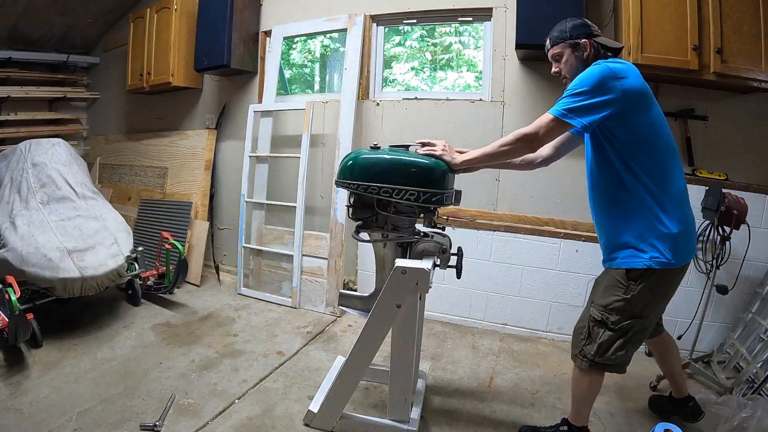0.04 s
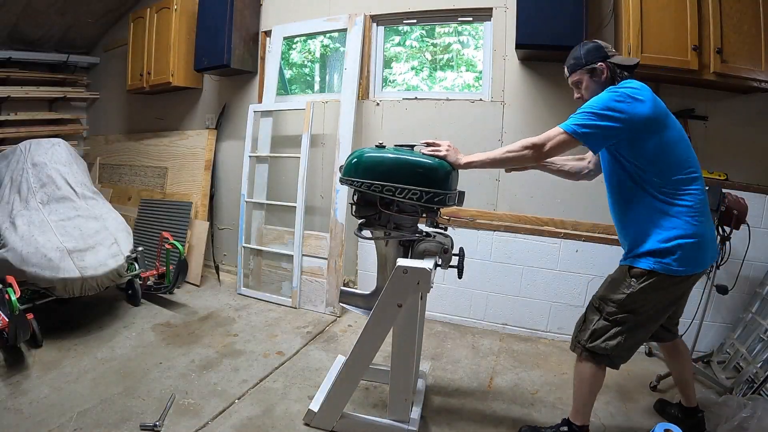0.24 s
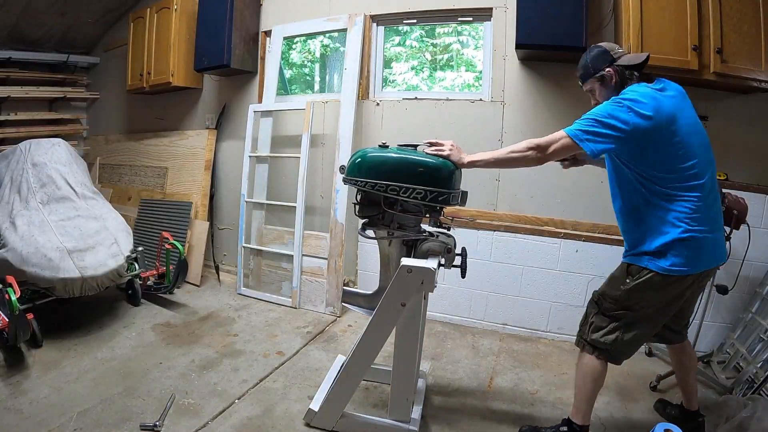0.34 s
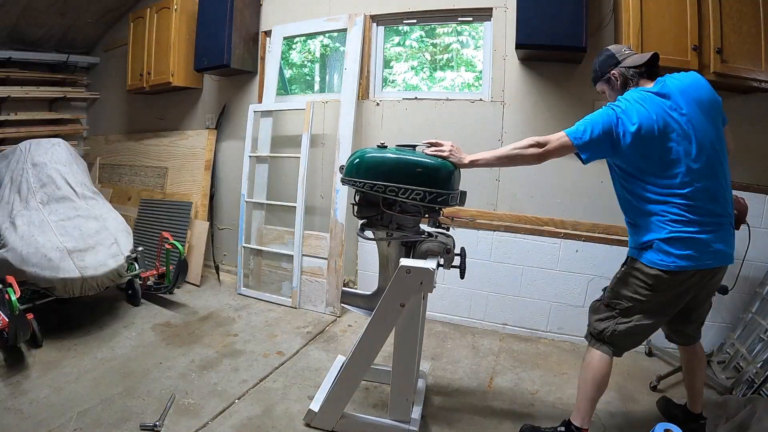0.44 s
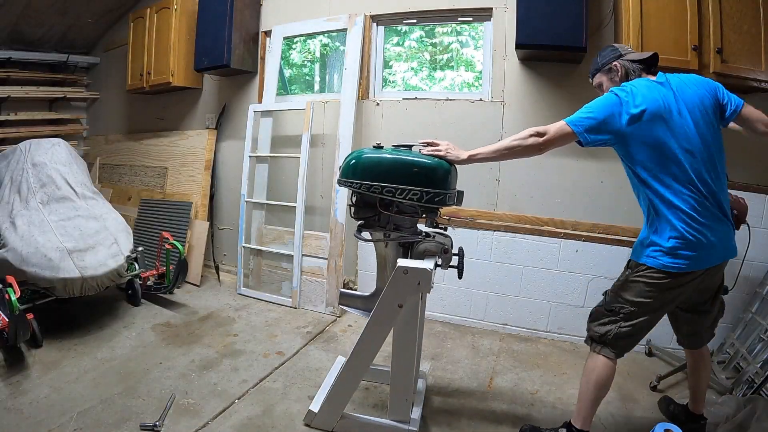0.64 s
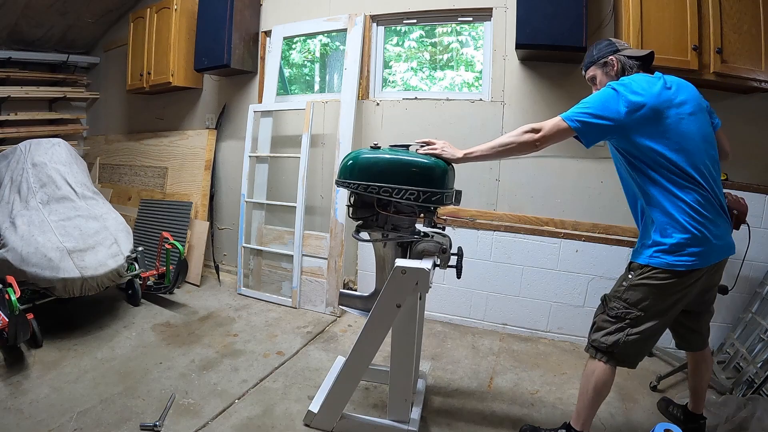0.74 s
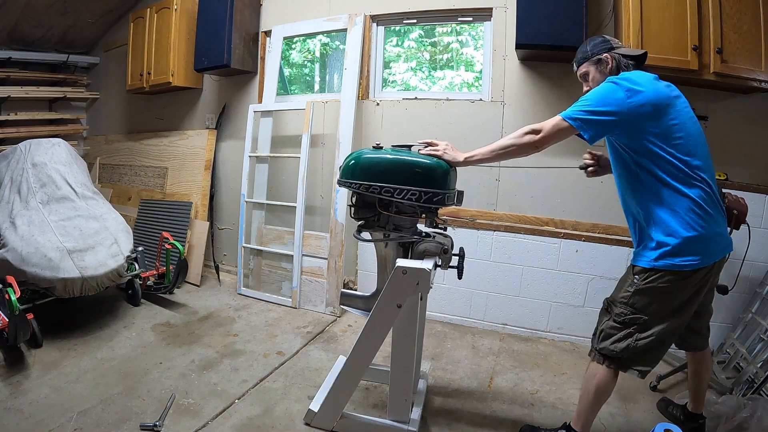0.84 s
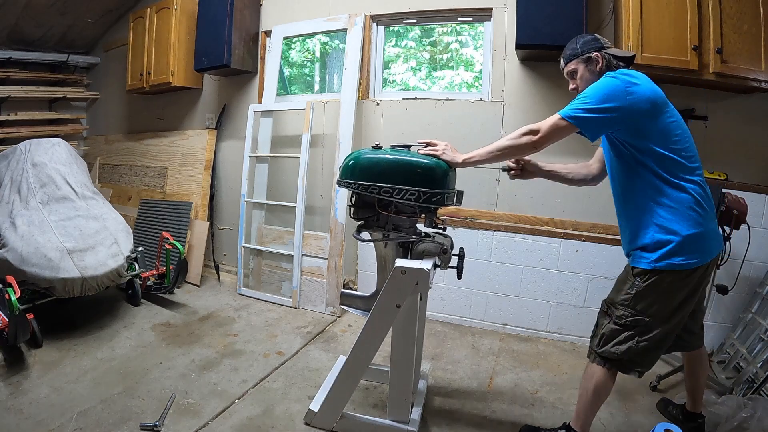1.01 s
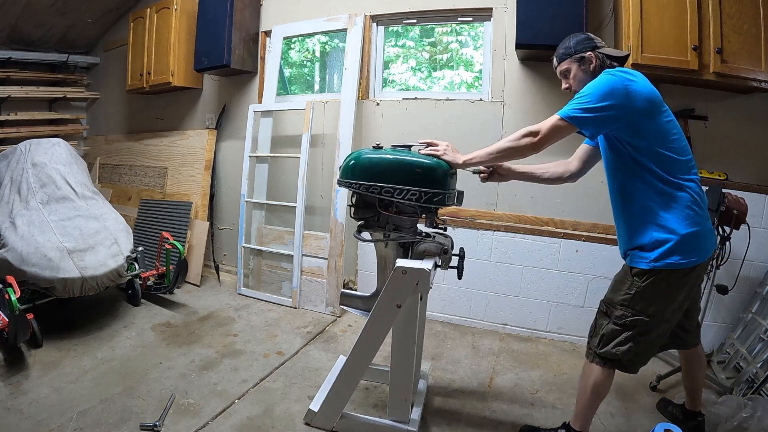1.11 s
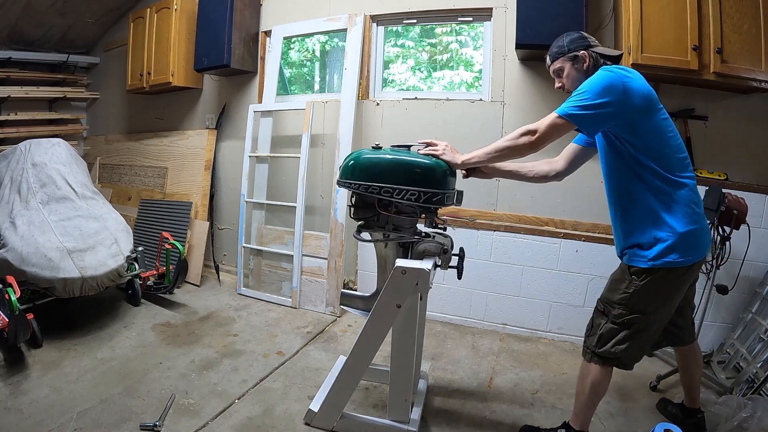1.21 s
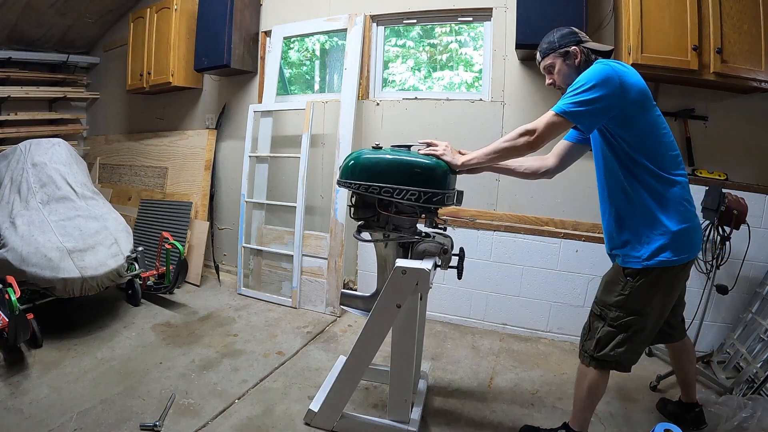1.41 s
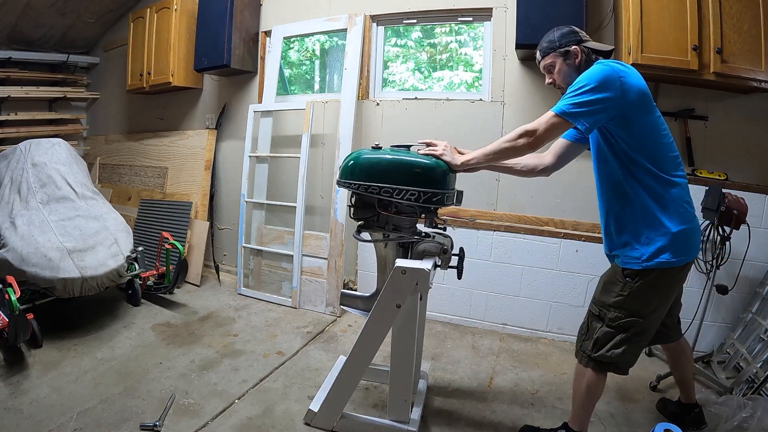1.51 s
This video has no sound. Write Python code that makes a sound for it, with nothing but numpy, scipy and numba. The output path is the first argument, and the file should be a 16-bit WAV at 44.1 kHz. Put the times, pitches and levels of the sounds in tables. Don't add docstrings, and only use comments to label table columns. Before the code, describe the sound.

An outboard engine turns over but does not fire. After a brief quiet low throb, a sharp clank, rapid clattering chugs, slowing rattles and a final bright metallic snap, in a reverberant garage heard from a few metres.

```python
import sys
import numpy as np
from scipy import signal
from scipy.fft import rfft, irfft
from scipy.io import wavfile
from scipy.ndimage import uniform_filter1d
from numba import njit

SR = 44100
rng = np.random.default_rng(int(sys.argv[2]) if len(sys.argv) > 2 else 0)


def bounce(signal):
    frames = np.transpose(np.atleast_2d(signal))
    limited = np.clip(frames, -1, 1)
    pcm = np.round(limited * 32767).astype(np.int16)
    wavfile.write(sys.argv[1], SR, pcm)


def ratio_of_db(decibels):
    return 10 ** (np.asarray(decibels, float) / 20)


N = 68355


def level(x, db):
    return x * ratio_of_db(db) / np.sqrt(np.mean(x ** 2))


def cut(x, hz, kind, order=2):
    return signal.sosfilt(signal.butter(order, hz, kind, fs=SR, output="sos"), x)


def colour(x, points):
    hz, db = np.array(points).T
    size = 2048
    bins_hz = np.arange(size // 2 + 1) * SR / size
    log_gain = np.interp(np.log(bins_hz + 1), np.log(hz), db) * np.log(10) / 20
    cepstrum = irfft(log_gain)
    cepstrum[1:size // 2] *= 2
    cepstrum[size // 2 + 1:] = 0
    h = irfft(np.exp(rfft(cepstrum)))
    return signal.fftconvolve(x, h / np.sqrt(np.sum(h ** 2)))[:N]


@njit
def ring(x, hz, t60):
    y, z = np.empty(len(x)), 0j
    pole = np.exp(2j * np.pi * hz / SR - np.log(1000.) / (t60 * SR))
    for i in range(len(x)):
        z = z * pole + x[i]
        y[i] = z.imag
    return y


def wander(step_s, smooth):
    size = int(step_s * SR)
    return uniform_filter1d(np.repeat(rng.standard_normal(N // size + 1), size), smooth)[:N]


def body(x, modes):
    wander_db, wander_s = 3, 0.025
    out = np.zeros(N)
    for hz, db, t60 in modes:
        share = rng.standard_normal(N) * ratio_of_db(wander_db * wander(wander_s, int(wander_s * SR)))
        out += ratio_of_db(db) / np.sqrt(t60) * ring(x * share, 1. * hz, 1. * t60)
    power = sum(ratio_of_db(2 * db) for _, db, _ in modes)
    return out / np.sqrt(power * SR / 4 / np.log(1000))


def clicks(rate_per_s):
    scatter_db = 2.5
    hits = (rng.random(N) < rate_per_s / SR) * rng.standard_normal(N)
    return level(hits * ratio_of_db(scatter_db * np.minimum(rng.exponential(size=N), 3)), 0)


def burst(t, s, db, fall_s, rise_s=0.005):
    u = np.maximum(t - s, 0)
    return ratio_of_db(db) * (1 - np.exp(-u / rise_s)) * np.exp(-u / fall_s)


def push(t, s, db, length_s):
    u = (t - s) / length_s
    return ratio_of_db(db) * np.sin(np.pi * np.clip(u, 0, 1)) * np.pi / (2 * length_s * SR)


# freq_hz [Hz], density_db [dB per Hz]
AIR_SPECTRUM = [(150, -1.5), (400, -11), (800, -21), (1200, -7), (2300, -16), (4400, -14.5), (8000, -16.5),
                (13000, -23)]


def background(t):
    throb_hz, steady, beat_s, beat_null_s = 75.5, 0.063, 0.105, 0.112
    beat = steady * np.clip(t, 0, 1) + np.sin(np.pi * (t - beat_null_s) / beat_s)
    throb = level(np.cos(2 * np.pi * throb_hz * t) * beat, -34.5)
    rumble = level(cut(rng.standard_normal(N + SR), [50, 90], "band", order=4)[SR:], -38)
    mid, side = (level(colour(rng.standard_normal(N), AIR_SPECTRUM), -56.5) for _ in range(2))
    duck_db, duck_at_s, duck_s = -7, 0.22, 0.084
    duck = ratio_of_db(duck_db * np.clip((t - duck_at_s) / duck_s, 0, 1))
    return duck * (throb + rumble) + mid + 0.5 * side * np.array([[1], [-1]])


@njit
def walls(x, lags, gain, damp):
    line, soft, out = np.zeros((8, 4096)), np.zeros(8), np.zeros((2, len(x)))
    for i in range(len(x)):
        total = 0.
        for k in range(8):
            soft[k] += (1 - damp) * (gain[k] * line[k, (i - lags[k]) & 4095] - soft[k])
            total += soft[k]
            out[k % 2, i] += soft[k]
        for k in range(8):
            line[k, i & 4095] = x[i] + soft[k] - total / 4
    return out


def garage(motor):
    t60_s, damp, wet_db = 0.42, 0.078, -13.5
    lags = rng.integers(500, 2200, 8)
    thin = cut(motor, 196, "high", order=1)
    return ratio_of_db(wet_db) * walls(thin, lags, ratio_of_db(-60 * lags / SR / t60_s), damp)


# start_s [s], level_db [dB], pitch_hz [Hz]
KNOCKS = [(.150, -51.5, 345), (0.231, -15.5, 356), (0.314, -23.5, 350), (0.481, -20, 363),
          (0.552, -14.5, 360), (0.604, -23, 343), (0.636, -12.5, 436.7), (.556, -19.5, 476),
          (.684, -25.5, 374), (0.827, -16.5, 421.4), (0.872, -26, 362), (1.01, -32, 399),
          (1.122, -31.5, 338), (1.133, -29, 475), (1.199, -33.5, 377), (1.26, -34, 350), (1.411, -46, 394)]


def stand(t):
    t60_s = 0.098
    out = np.zeros(N)
    for start_s, level_db, pitch_hz in KNOCKS:
        shudder = push(t, start_s, level_db, 0.0014)
        shudder += push(t, start_s + 0.0057, level_db + 4.5, 0.00072)
        shudder += push(t, start_s + 0.01264, level_db - 5.5, 0.0017)
        out += ring(shudder, 1. * pitch_hz, t60_s)
    return out


# start_s [s], level_db [dB], fall_s [s], pitch_hz [Hz]
PINGS = [(0.22, -12, 0.0056, 5950), (0.24, -22, .008, 6000), (0.24, -33, 0.0087, 6680),
         (0.23, -17.5, 0.017, 1500), (0.43, -25, 0.015, 930), (0.49, -20, .012, 990),
         (0.53, -12.5, 0.0095, 940), (0.42, -31, 0.0046, 970), (0.59, -22, 0.0097, 6000),
         (0.57, -26, 0.01, 960), (0.74, -19.5, 0.018, 6380), (0.744, -24, 0.0086, 3680),
         (0.741, -23, 0.01, 4740), (0.746, -27, 0.051, 8500), (0.868, -21, 0.013, 900),
         (0.21, -23, 0.028, 960), (.235, -29, 0.018, 760), (.79, -26.5, 0.02, 620), (.81, -30, 0.025, 860),
         (.85, -25, 0.013, 1000), (0.62, -25.5, .02, 540), (1.04, -39, 0.087, 940), (.31, -33, .05, 350),
         (.24, -28.5, 0.07, 350), (1.087, -35, 0.016, 5900), (1.088, -27, 0.0085, 4140),
         (1.0875, -34, .012, 4960), (1.21, -22, .012, 7200), (1.195, -23, 0.012, 4780),
         (1.1935, -24.5, 0.015, 1530), (1.192, -26, 0.0053, 3250), (1.15, -41, 0.046, 1500),
         (1.15, -39, 0.034, 1920), (1.2, -27.5, 0.013, 1570), (1.222, -26, 0.014, 4900),
         (1.3, -42.5, 0.047, 410), (1.412, -47.5, .03, 860)]


def pings(t):
    t60_s, rise_s, rough_rad = 0.01, 0.0013, 0.16
    out = np.zeros(N)
    for start_s, level_db, fall_s, pitch_hz in PINGS:
        phase = 2 * np.pi * pitch_hz * t + np.cumsum(rough_rad * rng.standard_normal(N))
        scrub = burst(t, start_s, level_db, fall_s, rise_s) * np.sin(phase)
        out += ring(scrub, 1. * pitch_hz, t60_s)
    return out * 2 * np.log(1000) / (t60_s * SR) * ratio_of_db(7.5)


# start_s [s], level_db [dB], pitch_hz [Hz]
TICKS = [(0.2113, -20, 2130), (0.2264, -6, 2610), (0.2862, -12, 2550), (0.304, -4.5, 2980),
         (.304, -13, 4000), (0.4039, -10, 2150), (0.4393, -19, 4120), (0.449, -15, 3100),
         (0.4654, -14, 2340), (.471, -17, 5600), (0.4932, -5, 3900), (.503, -11, 2780), (0.5276, -6, 5230),
         (0.5456, -9, 2000), (.553, -11, 4500), (0.5853, -11, 2970), (.59, -11, 4200), (.607, -18, 5900),
         (.641, -11, 1500), (0.66, -11, 3000), (0.7406, -12, 2030), (0.7417, -9, 4640), (0.7504, -8, 4300),
         (0.8449, -9, 2230), (0.8714, -8, 2241), (.876, -8, 1100), (0.966, -23, 2790), (1.088, -21, 3880),
         (1.09, -22, 5800), (1.1921, -7, 6650), (1.1947, -7, 3070), (1.201, -12, 4800), (1.208, -14, 3200),
         (1.227, -12, 1890), (1.243, -20, 1700)]


def ticks():
    gain_db, rise_s, fall_s, width = -8.5, 0.00041, 0.0024, 0.14
    out, size = np.zeros(N), 1024
    u = np.arange(size) / SR
    envelope = (1 - np.exp(-u / rise_s)) * np.exp(-u / fall_s)
    for start_s, level_db, pitch_hz in TICKS:
        band_hz = [pitch_hz * (1 - width), pitch_hz * (1 + width)]
        grit = cut(rng.standard_normal(size), band_hz, "band", order=1)
        out[int(start_s * SR):][:size] += level(grit, level_db + gain_db) * envelope
    return out


# time_s [s], level_db [dB]
EFFORT = [(.205, -43.5), (.25, -33.5), (.36, -35.5), (.43, -33.5), (.47, -27), (.66, -26.5), (.72, -34),
          (.78, -27.5), (.9, -31.5), (1.0, -34.5), (1.07, -41), (1.17, -49.5), (1.3, -50), (1.45, -58)]


def effort(t):
    return (t > EFFORT[0][0]) * ratio_of_db(np.interp(t, *np.array(EFFORT).T))


def clusters():
    bunch_db, bunch_s = 3.5, 0.006
    return ratio_of_db(bunch_db * wander(bunch_s, int(bunch_s * SR) // 2))


# start_s [s], metal_db [dB], casing_db [dB], fall_s [s], pitch_hz of struck part [Hz]
CLANKS = [(0.123, -57.5, -73, 0.029, 2020), (.144, -64, -52.5, 0.099, 2390),
          (0.201, -49, -27.5, 0.043, 1400), (0.2218, -18, -14.5, 0.026, 5950),
          (0.302, -24.5, -25.5, 0.028, 2880), (0.441, -30, -25.5, 0.019, 4070),
          (0.461, -25.5, -17.5, 0.024, 1500), (0.492, -21.5, -23, 0.03, 3930),
          (0.522, -19, -14.5, 0.0054, 5260), (0.546, -8.5, -11, 0.0029, 4630),
          (0.583, -19.5, -15, 0.016, 6030), (.637, -49, -12.5, 0.0097, 1500),
          (0.7406, -15, -26, 0.017, 4533), (0.844, -19, -22.5, 0.014, 2300),
          (0.87, -20.5, -16.5, 0.014, 2140), (0.962, -28.5, -31, 0.025, 6460),
          (1.085, -29, -32, 0.017, 3870), (1.123, -48, -24, 0.005, 1970), (1.1813, -28, -41, 0.019, 5540),
          (1.1897, -18.5, -34.5, 0.019, 3350), (1.203, -32.5, -31, 0.023, 1930),
          (1.223, -33, -40, 0.052, 5000), (1.403, -78.5, -40.5, 0.012, 1860),
          (1.516, -98.5, -51, 0.038, 1550)]
# freq_hz [Hz], level_db [dB], t60_s [s]
CASING = [(350, -1, .14), (522, -11, 0.028), (687.7, -6, 0.094), (840, -11, 0.029), (942, 0, 0.075),
          (989.5, -3.5, 0.072), (1169, -6.5, 0.35), (1400, -6.5, 0.099), (1550, -1, 0.029),
          (1789, -5, 0.056), (2101, -8.5, 0.059), (2607, -5, 0.025)]
# freq_hz [Hz], level_db [dB], t60_s [s]
METAL = [(1535, -23, 0.044), (1950, -6.5, 0.036), (2300, -6, 0.03), (2755, -5, 0.037), (3100, -2.5, 0.012),
         (3713, -5.5, 0.024), (4500, -13, 0.13), (4760, -8, 0.014), (5410, -10.5, 0.062),
         (5950, -3, 0.0092), (6710, 0, 0.014), (8500, -26, 0.11), (9900, -26, 0.033), (11600, -11, 0.014)]
# freq_hz [Hz], density_db [dB per Hz]
CRACK = [(290, -73.5), (500, -18.5), (922, -6), (1240, -14), (1560, -5), (2490, -9), (4730, -6.5),
         (11800, -14), (15000, -34)]


def metalwork(t):
    rattle_per_s, chatter_per_s = 6000, 9000
    shake = effort(t) * clusters() * clicks(rattle_per_s)
    chatter = clicks(chatter_per_s)
    bright_env, dull_env, notes = np.zeros(N), np.zeros(N), np.zeros(N)
    for start_s, metal_db, casing_db, fall_s, pitch_hz in CLANKS:
        bright_env += burst(t, start_s, metal_db, fall_s)
        dull_env += burst(t, start_s, casing_db, fall_s)
        notes += body(burst(t, start_s, metal_db - 7, fall_s) * chatter, [(pitch_hz, 0, 0.007)])
    bright = bright_env * chatter + ratio_of_db(-2.5) * shake
    dull = dull_env * clicks(chatter_per_s) + shake
    crack = ratio_of_db(5) * colour(bright, CRACK)
    thud = ratio_of_db(13) * cut(dull, [300, 1900], "band")
    spring = ratio_of_db(2) * cut(bright * (t > 0.9), [5750, 13500], "band")
    return body(bright, METAL) + notes + crack + body(dull, CASING) + thud + spring


# start_s [s], level_db [dB], pipe_hz [Hz]
PUFFS = [(0.227, -17.5, 121), (0.457, -10, 120), (.484, -22, 150), (0.513, -8.5, 116), (.538, -23, 120),
         (0.558, -10, 136), (0.583, -16.5, 195), (.598, -10, 110.5), (0.621, -27, 150), (0.642, -13, 96),
         (0.666, -23, 130), (0.685, -11.5, 135), (.715, -27, 139), (0.738, -13.5, 132), (0.797, -16, 205),
         (0.886, -17.5, 181), (0.839, -23.5, 119), (.983, -22, 160), (1.015, -28.5, 170),
         (1.085, -31.5, 174), (1.127, -30, 151), (1.148, -30, 190)]
# freq_hz [Hz], level_db [dB], t60_s [s]
BOOMS = [(70, -7.5, 0.26), (97.4, -15.5, 0.3), (131.7, -11.5, 0.19), (154.3, -26, 0.43), (198, -16.5, 0.22),
         (260, -52, 0.067)]


def puffs(t):
    push_s, suck_s, suck_db, pipe_t60_s, churn_db = 0.0019, 0.0036, -11, 0.07, -2
    shoves, pipe = np.zeros(N), np.zeros(N)
    for start_s, level_db, pipe_hz in PUFFS:
        suck = push(t, start_s - suck_s, level_db + suck_db, suck_s)
        shove = push(t, start_s, level_db, push_s) - suck
        shoves += shove
        pipe += ratio_of_db(3.5) * ring(shove, 1. * pipe_hz, pipe_t60_s)
    booms = sum(ratio_of_db(db) * ring(shoves, 1. * hz, t60) for hz, db, t60 in BOOMS)
    churn = ratio_of_db(churn_db) * body(effort(t), BOOMS)
    return cut(pipe + booms + churn, 68, "high")


SIDE_DIP_HZ = [3500, 6200]


def scene():
    t = np.arange(N) / SR
    motor = metalwork(t) + pings(t) + ticks() + stand(t) + puffs(t)
    wet = garage(motor)
    side = cut(wet[0] - wet[1], 1500, "high", order=1)
    side = cut(side, SIDE_DIP_HZ, "bandstop", order=1)
    side += ratio_of_db(-11) * cut(np.roll(motor, int(0.003 * SR)), 4700, "high")
    return motor + wet.sum(axis=0) + ratio_of_db(0.5) * side * np.array([[1], [-1]]) + background(t)


def top_cut(x):
    return signal.sosfilt(signal.butter(12, 15120, fs=SR, output="sos"), x)


def record(dry):
    soft = np.tanh(0.46 * cut(dry, 6950, "low") + 0.21 * dry)
    mix = signal.sosfilt(signal.ellip(6, 0.3, 50, 14000, fs=SR, output="sos"), soft)
    return top_cut(mix)


dry = scene()
out = record(dry)
bounce(out)
```